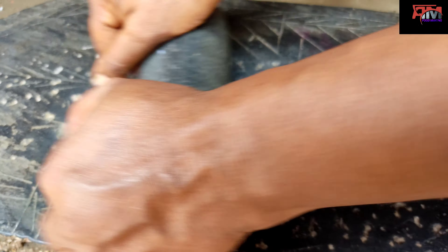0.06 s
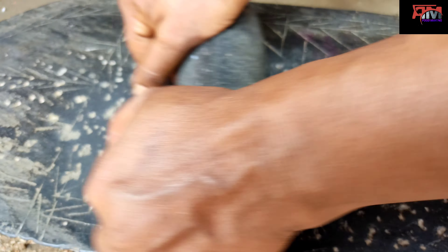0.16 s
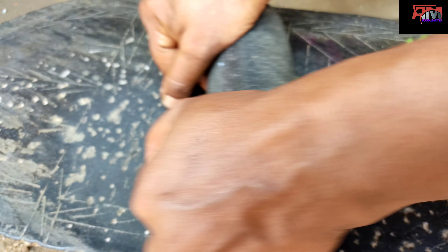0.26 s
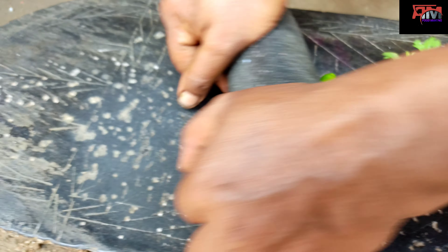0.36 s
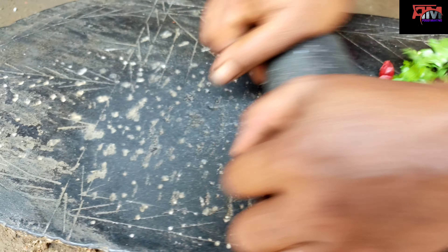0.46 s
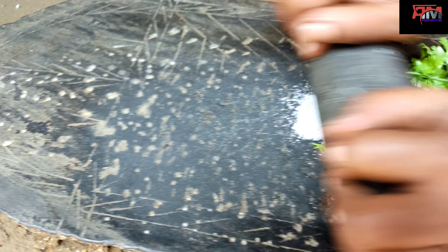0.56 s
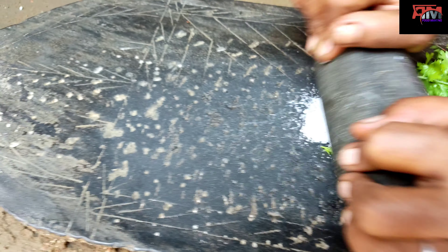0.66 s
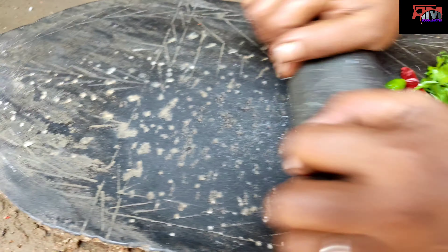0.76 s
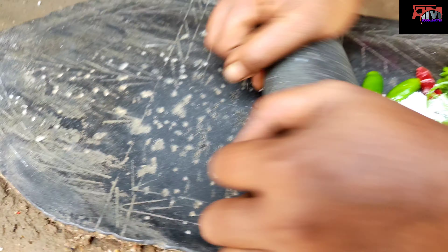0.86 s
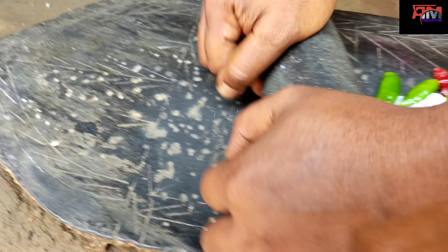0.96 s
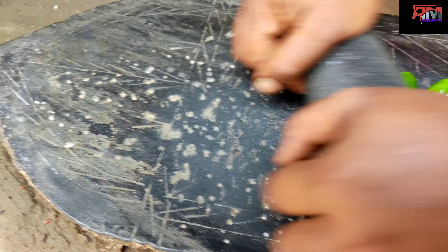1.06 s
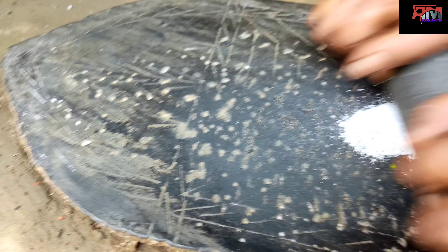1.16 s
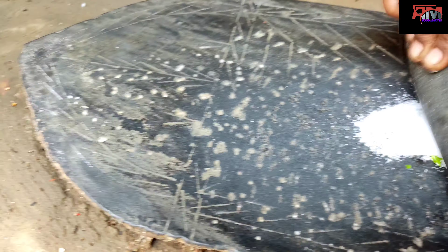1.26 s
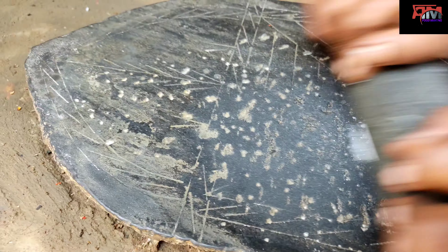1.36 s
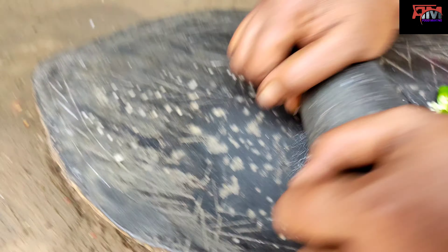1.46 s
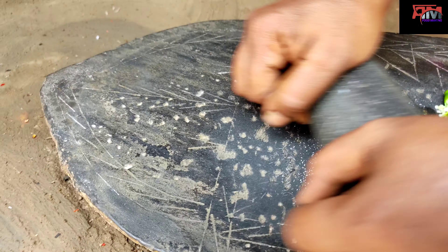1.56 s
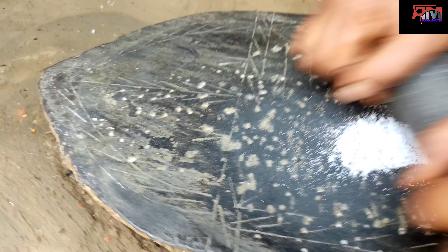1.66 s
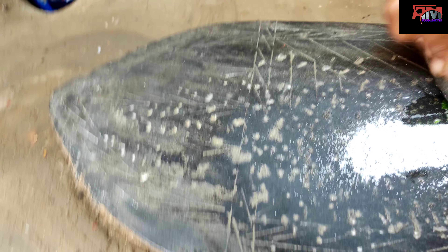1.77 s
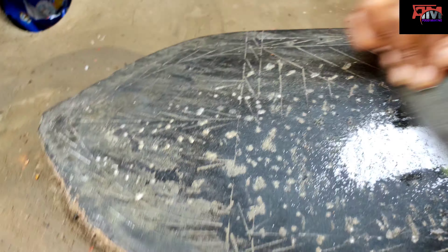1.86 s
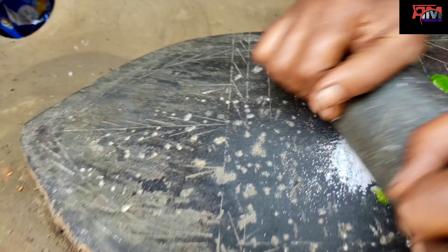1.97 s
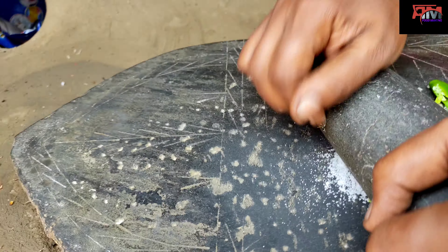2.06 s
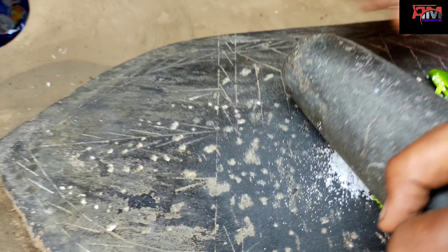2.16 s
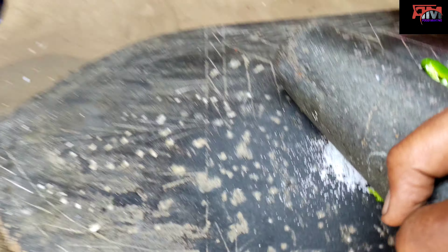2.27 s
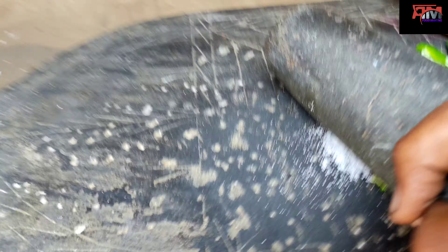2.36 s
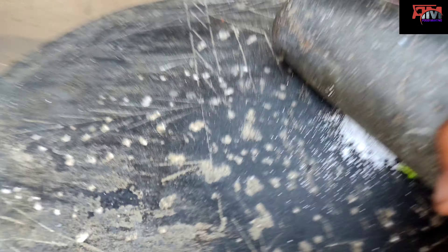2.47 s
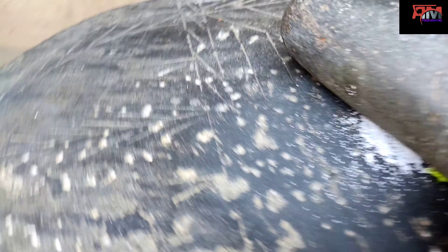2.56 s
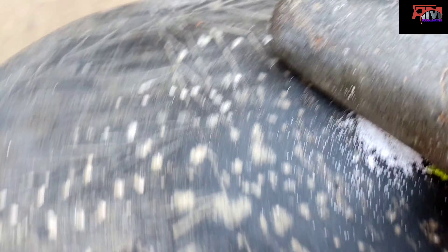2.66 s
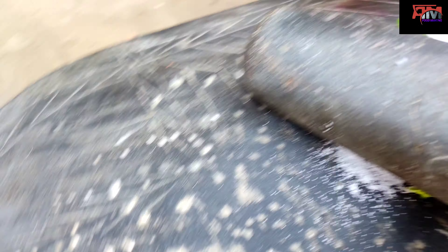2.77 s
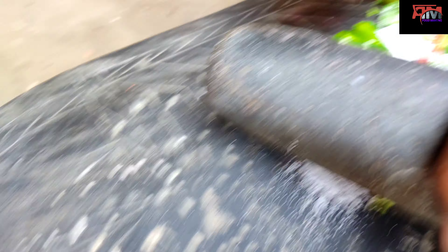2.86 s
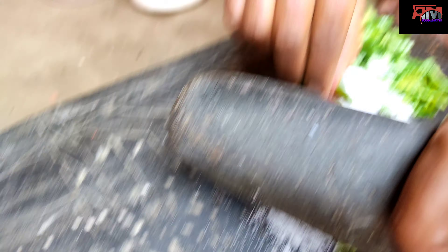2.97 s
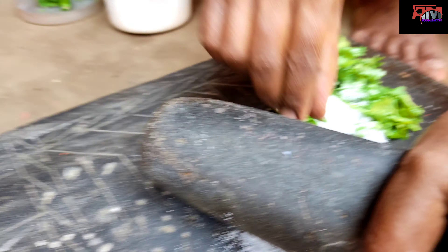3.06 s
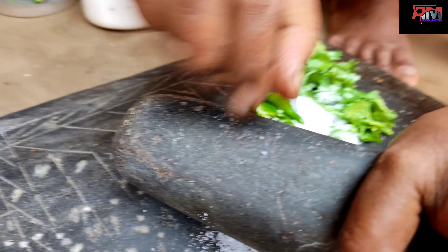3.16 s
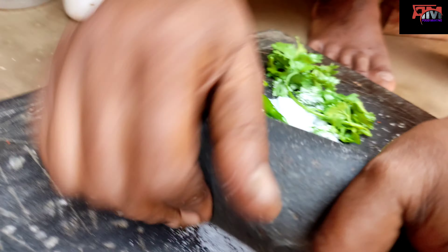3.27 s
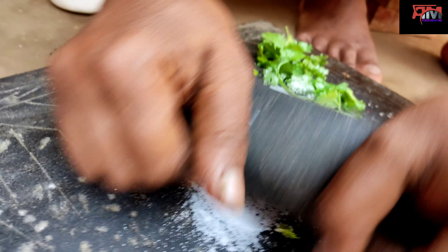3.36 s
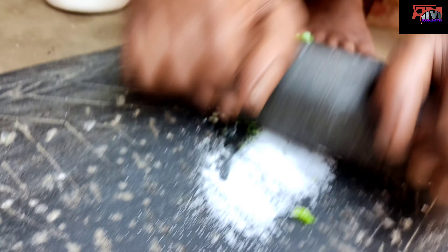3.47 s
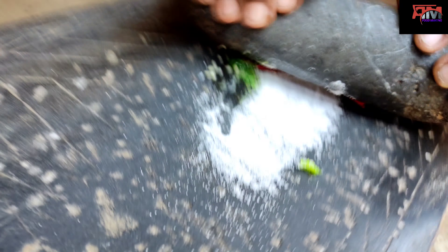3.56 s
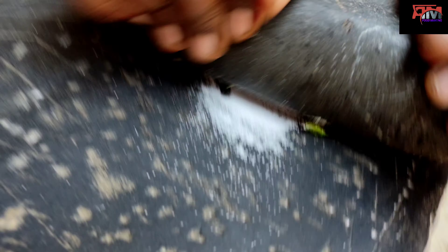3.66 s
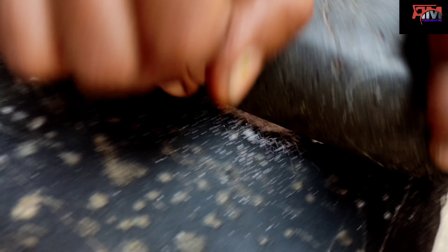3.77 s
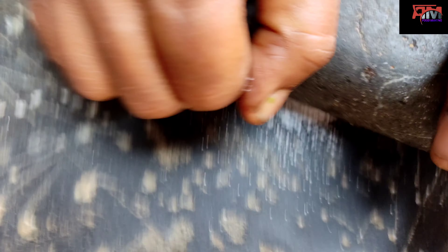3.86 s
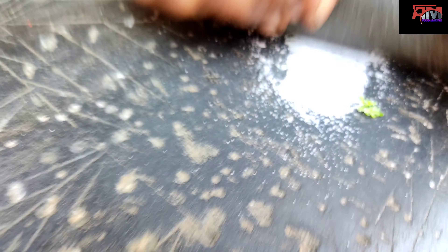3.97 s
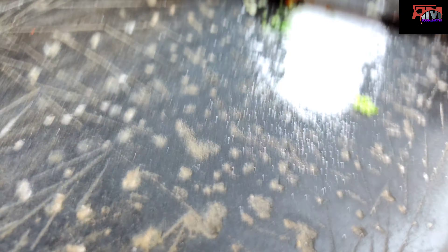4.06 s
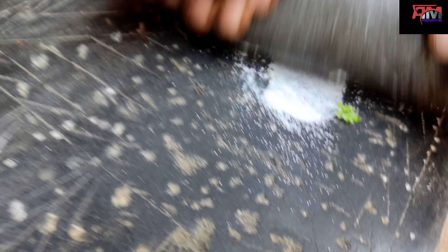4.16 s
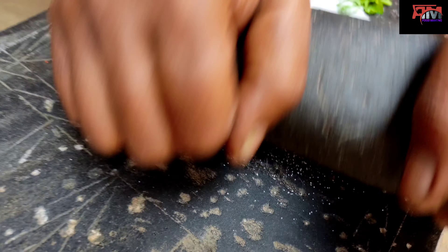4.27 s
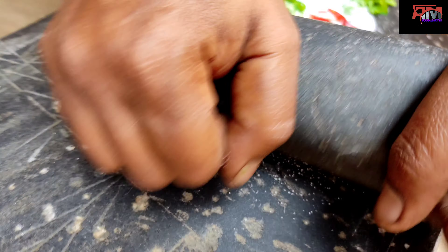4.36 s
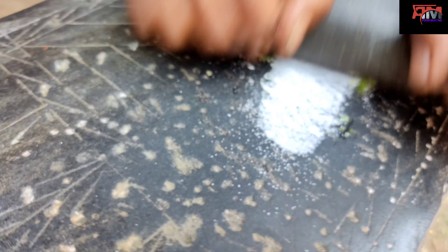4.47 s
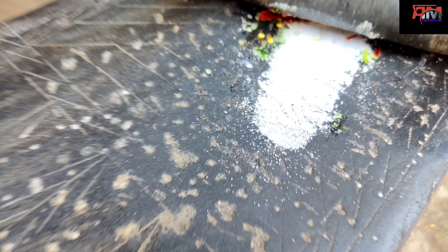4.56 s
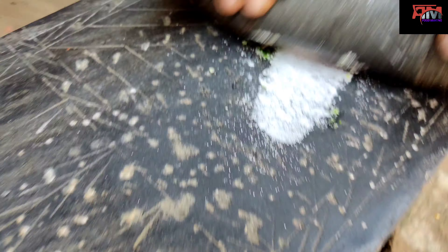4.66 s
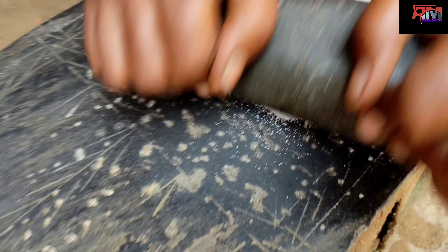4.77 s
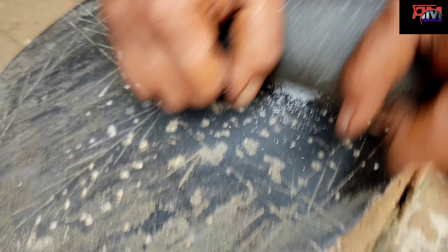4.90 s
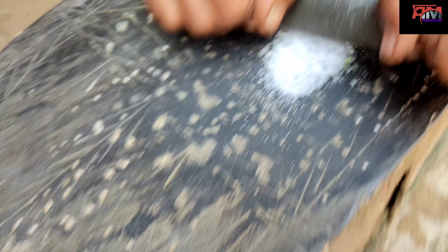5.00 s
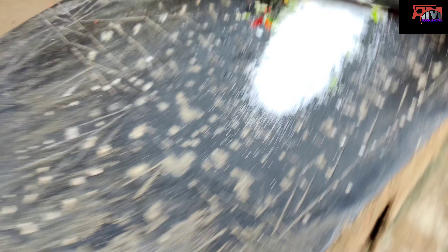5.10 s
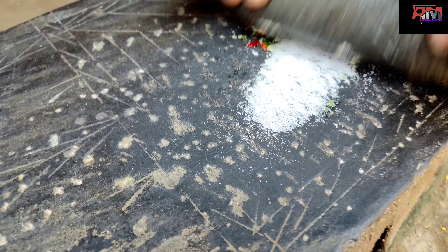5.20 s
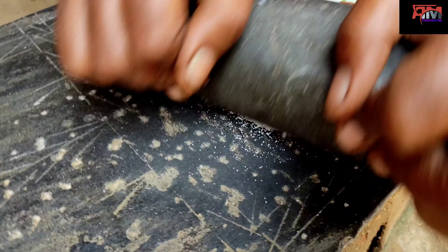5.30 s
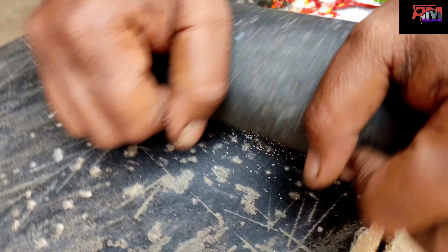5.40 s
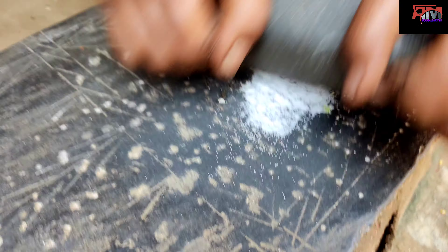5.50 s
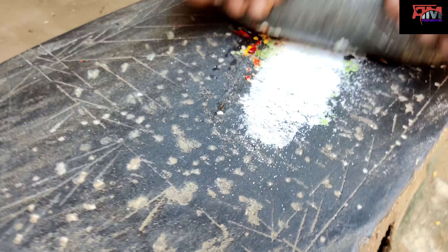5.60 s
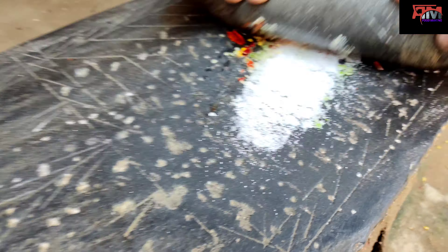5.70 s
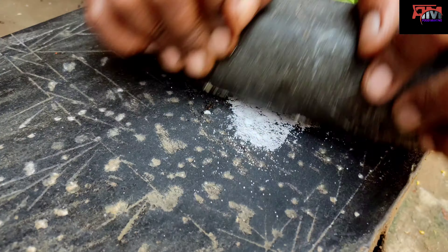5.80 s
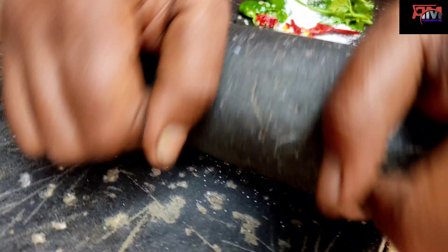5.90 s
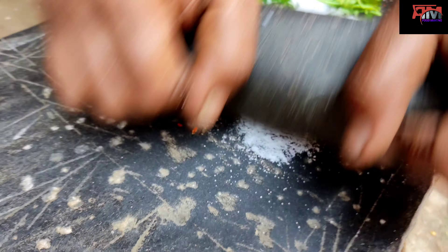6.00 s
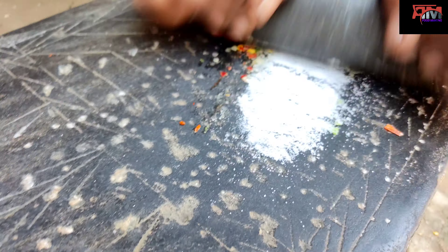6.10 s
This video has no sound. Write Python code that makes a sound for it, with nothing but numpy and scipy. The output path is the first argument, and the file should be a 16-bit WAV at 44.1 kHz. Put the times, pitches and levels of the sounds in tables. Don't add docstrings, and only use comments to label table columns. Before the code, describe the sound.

Rhythmic gritty stone-on-stone grinding, a few loud hollow knocks, a quieter pause, then faster strokes crushing salt with crisp crackling.

```python
import sys
import numpy as np
from scipy import signal
from scipy.fft import rfft, irfft, dct, next_fast_len
from scipy.io import wavfile
from scipy.ndimage import uniform_filter1d

SR = 44100
rng = np.random.default_rng(int(sys.argv[2]) if len(sys.argv) > 2 else 0)


def dump(signal):
    limited = np.clip(np.atleast_2d(signal).T, -1, 1)
    pcm = np.round(limited * 32767).astype(np.int16)
    wavfile.write(sys.argv[1], SR, pcm)


def level_to_linear(level):
    exponent = np.asarray(level, float) / 20
    return 10 ** exponent


N = 270774
SIZE = next_fast_len(N + SR)
HZ = np.maximum(np.fft.rfftfreq(SIZE, 1 / SR), 1)
LOG_HZ = np.log(HZ)
TIME_S = np.arange(N) / SR

# f/Hz, level/dB
AIR_COLOUR = [(12, -22), (20, 7.5), (74, -2), (171, 4.5), (316, -5.5), (394, 1.5), (770, -8.5), (2410, -14),
              (2850, -10.5), (5120, -21), (5720, -17.5), (8450, -12.5), (10600, -55), (12500, -56),
              (15600, -54)]
# start t/s, length t/s, level/dB
INSECT_BOUTS = [
    (0.0, 2.2, -60),
    (2.61, .1, -59),
    (2.69, .11, -53),
    (2.82, .1, -54),
    (2.95, .12, -54),
    (3.08, .12, -59),
    (3.23, .18, -59),
]
# start t/s, length t/s, f/Hz, level/dB
BIRD_COOS = [
    (2.052, 0.21, 922, -52.5),
    (2.49, 0.095, 865, -55),
]
# t/s, peak level/dB
GROUND_THUMPS = [
    (0.656, -21),
    (1.313, -15.5),
    (2.384, -22.5),
    (2.801, -30),
    (2.95, -34),
    (4.087, -24),
    (4.558, -28),
]
# f/Hz, level/dB, t60/s
GROUND_MODES = [(69, -6.5, 0.14), (117, -7.5, 0.18), (178, 9.5, 0.045), (296, 13, 0.01)]

# f/Hz, likeness 0 to 1
PORT_LIKENESS = [(40, 0.8), (150, 1), (500, 0.94), (1200, 1), (2500, 0.8), (5000, 0.7), (12000, 0.87)]
# f/Hz, left-right level/dB
PORT_BALANCE = [(60, 3.5), (130, 2.5), (290, 3), (640, 0.5), (1410, 0), (3100, -1.5), (6820, -3.5),
                (15000, 17)]
# f/Hz, left lead/rad
PORT_PHASE = [(30, -0.56), (150, -0.69), (400, -0.79), (1200, -1.695), (2200, -1.34), (4500, -1.96),
              (15000, -1.42)]
# t/s, left-right level/dB
ROLLER_PLACE = [(0.0, 0), (0.29, -3), (0.7, 4), (0.8, -0.5), (0.87, 0.5), (3.47, 3.5), (3.5, 0.5),
                (4.89, 0.5), (5.1, -1.5), (5.16, 4), (5.37, -2.5), (5.44, 0.5), (5.63, -1.5), (5.69, 5.5),
                (5.801, -2.5), (6.02, 0), (6.05, -9.5), (6.14, 0)]

# t/s, peak level/dB, left-right level/dB, tilt/(dB per octave)
FLAT_STONE = [(360, -12, 0.044), (240, -21, 0.11), (1233, 0.5, 0.03), (1386, -0.5, 0.05), (1503, -6, 0.027),
              (1730, 4, 0.013), (3440, -14.5, 0.011), (2516, -8, 0.036), (2730, -12, 0.023),
              (2040, 0.5, 0.0067)]
FLAT_LANDINGS = [
    (0.6447, 0.5, 3, 1),
    (0.732, -21.5, -1.5, 10.5),
    (0.836, -30.5, 1, -9),
    (1.081, -38, -1, 9),
    (1.11, -39.5, 8.5, 5),
    (1.172, -32, 3, -11),
]
HEAVY_STONE = [(255.3, -9, 0.11), (418, -4.5, 0.042), (836, -10, 0.051), (1294, 7, 0.026), (1480, 3, 0.03),
               (543, -10, 0.03), (1740, 1, 0.006), (2515, -4.5, 0.029), (3100, -14, 0.015),
               (2160, -6, 0.018)]
HEAVY_LANDINGS = [
    (1.3028, -1.5, 2, 1),
    (2.384, -44.5, 5, -16),
    (2.952, -47, 7.5, -11),
    (3.059, -50, 8, -8),
]
EDGE_STONE = [(363, -0.5, 0.035), (546, -16.5, 0.035), (1087, 6.5, 0.045), (1413, -2, 0.026),
              (1116, -6, 0.026), (2580, -2, 0.04), (2845, -2, 0.035), (3130, -12, 0.011)]
EDGE_LANDINGS = [
    (3.723, -9, -1, 0),
    (3.947, -37.5, 5, -2.5),
    (4.215, -1.5, -1, 0),
    (4.45, -42, 7.5, -18),
    (5.048, -34.5, 7.5, -1),
    (5.253, -39, 2, -3),
    (5.746, -27.5, -15, -3.5),
]
TIP_STONE = [(462, 0.5, 0.029), (590, -14, 0.079), (1310, 2.5, 0.043), (1380, -13.5, .05), (1800, -15, .05),
             (2540, -10, 0.027)]
TIP_LANDINGS = [
    (1.876, -18.5, 0, 0.5),
    (1.939, -26.5, 2, 0.5),
]
HEEL_STONE = [(234, -10, 0.074), (451, -1, 0.036), (1040, -2, 0.056), (1384, -0.5, .06), (1930, -18, 0.034),
              (2560, -3.5, .04), (2870, -12.5, .035)]
HEEL_LANDINGS = [
    (4.071, -17, -0.5, -1),
    (4.5, -39, 4, -3),
    (2.2, -45, 0, -3),
]
REST_STONE = [(386, -3, 0.036), (584, -4, 0.051), (1107, 6, .08), (1370, -9, 0.05), (1730, -19, .03)]
REST_LANDINGS = [
    (2.134, -23.5, 2, -5),
    (2.176, -40, 1, -6),
]
# delay t/s, level/dB
ROCKING = [
    (.0093, -16),
    (.037, -21),
]

# f/Hz, density level/dB
SALT_COLOUR = [(1470, -79), (2500, -14.5), (3030, -19.5), (4180, -8.5), (4790, -10.5), (5670, -4),
               (6820, -1), (7250, 2.5), (7650, 3), (8920, 0), (10600, -17.5), (14100, -20), (15600, -32.5)]
# f/Hz, width f/Hz, level/dB
SLAB_RINGS = [(4560, 82, -6), (5805, 52, 5.5)]
# f/Hz, width f/Hz, level/dB
SLAB_HOLLOWS = [(3910, 330, -6), (5050, 200, -6)]
# t/s, peak level/dB, left-right level/dB, dullness -1 to 1, t60/s
SINGLE_CRYSTALS = [(0.31, -21.5, 1, 0.3, 0.017), (0.3454, -36, 4, 0.3, 0.02),
                   (0.3541, -32.5, 1.5, 0.3, 0.02), (0.3604, -36, -2, 0.3, 0.02),
                   (0.378, -33, 3, 0.3, 0.028), (0.4868, -29, 5, 0.26, 0.029), (0.544, -27, -5, 0.3, 0.017),
                   (0.548, -22.5, -1, 0.36, 0.018), (0.63, -27, 5, 0.32, 0.02),
                   (0.6359, -21, 7, 0.37, 0.017), (0.642, -20, 2, 0.36, 0.027),
                   (0.652, -20.5, 6, 0.34, 0.018), (0.734, -28, 1, 0.3, 0.02), (0.7447, -24, 0, 0.34, 0.046),
                   (0.7696, -17.5, -5, 0.3, 0.02), (0.8093, -14.5, 1, 0.59, 0.032),
                   (0.818, -18.5, -6, 0.92, 0.026), (0.965, -35, 9, 0.4, 0.023),
                   (1.0829, -40, -3, 0.3, 0.012), (1.1119, -34, 3, 0.3, 0.017), (1.172, -36, -1, 0.3, 0.03),
                   (1.252, -35.5, 23, 0.53, 0.025), (1.251, -20.5, -4, 0.96, 0.03),
                   (1.287, -22, 1.0, 0.3, 0.023), (1.3054, -26.5, 2.5, 0.34, 0.03),
                   (1.356, -36, -2.5, 0.27, 0.02), (1.3725, -16, -11, 0.54, 0.02),
                   (1.4, -20, -2, 0.39, 0.028), (1.7769, -36, 1.5, 0.26, 0.018),
                   (1.826, -19.5, -4, 0.41, 0.02), (2.0986, -41, 3.0, 0.3, 0.02),
                   (2.646, -31, 8, 0.24, 0.016), (2.962, -38, 4, 0.26, 0.023),
                   (3.0594, -31.5, 2, 0.24, 0.021), (3.1038, -40, 3, 0.33, 0.024),
                   (3.1158, -34, 0, 0.24, 0.025), (3.24, -41, 1, 0.3, 0.022),
                   (3.517, -20, 2, 0.11, 0.021), (3.5376, -11.5, -6, 0.11, 0.029),
                 (3.557, -13, 2, 0.1, 0.024), (3.5622, -16.5, 1, 0.11, 0.027),
                 (3.5717, -19, -2, 0.1, 0.033), (3.5818, -9.5, 0, 0.34, 0.024),
                 (3.6312, -15, 4, 0.1, 0.032), (3.6364, -9.5, 2, 0.1, 0.017),
                 (3.6494, -8, -3, 0.091, 0.017), (3.6598, -12, 6, 0.11, 0.025),
                 (3.6844, -10.5, 4, 0.11, 0.027), (4.0218, -20, 4, 0.1, 0.031),
                 (4.0542, -11, -4.5, 0.083, 0.03), (4.0837, -16, 7, 0.1, 0.031),
                 (4.127, -10.5, -2, 0.1, 0.025), (4.136, -15, 0, 0.081, 0.031),
                 (4.148, -14.5, 4, 0.1, 0.028), (4.16, -21, 3, 0.1, 0.022), (4.1904, -19, 3, 0.089, 0.019),
                 (4.2462, -21, 3, 0.1, 0.023), (4.655, -23, 4, 0.1, 0.018), (4.678, -17.5, -5, 0.1, 0.041),
                 (4.6968, -18, -3, 0.091, 0.033), (4.7267, -15, -1, 0.11, 0.028),
                 (5.0552, -32, 1, 0.13, 0.032), (5.0766, -21.5, -6, 0.087, 0.025),
                 (5.1934, -21.5, 8, 0.1, 0.03), (5.217, -2.5, 0, 0.081, 0.0083),
                 (5.5152, -33.5, 1, 0.087, 0.025), (5.734, -25, 3, 0.11, 0.025),
                 (6.07, -34, -5, 0.1, 0.025), (5.2252, -8, 7, 0.1, 0.011), (5.207, -21, 5, 0.1, 0.03),
                 (3.6663, -7, 8, 0.1, 0.015), (3.672, -11, 1, 0.1, 0.012), (3.678, -3, 2, 0.1, 0.013),
                 (3.695, -11, 5, 0.1, 0.017)]
# t/s, level/dB, rise t/s, fall t/s (each for 25 dB), coarseness level/dB
CRYSTAL_HEAPS = [(.31, -43, 0.018, 0.14, 7), (.55, -36.5, 0.012, 0.19, 11.5), (.64, -40.5, .02, 0.03, 23),
                 (.82, -31.5, 0.033, 0.079, 8), (1.403, -36, 0.23, 0.13, 12),
                 (2.578, -45, 0.15, 0.023, 11.5), (2.65, -43.5, 0.13, 0.12, 9.5),
                 (3.109, -45, 0.025, 0.074, 14.5), (3.262, -48.5, 0.13, 0.3, 12),
                 (3.535, -29, 0.045, 0.11, 9.5), (3.571, -23.5, 0.057, 0.016, -14),
                 (3.651, -21, .015, 0.055, -13), (3.68, -15.5, 0.079, 0.089, -11),
                 (4.052, -23, 0.054, 0.086, -4.5), (4.08, -33, 0.052, 0.012, -17),
                 (4.15, -25.5, 0.019, 0.094, -13), (4.194, -20, 0.039, 0.1, -7),
                 (4.579, -34.5, 0.059, 0.14, 5.5), (4.7, -28.5, 0.055, 0.14, -0.5),
                 (5.085, -34, 0.082, 0.18, 8.5), (5.45, -42, 0.097, 0.066, 8.5),
                 (5.628, -35.5, 0.04, 0.082, 3), (5.863, -30.5, 0.27, 0.065, -3)]

# start t/s, length t/s, rumble level/dB, ring level/dB, salt level/dB
PULL_STROKES = [(-.01, 0.055, -64, -48.5, -75), (.44, 0.13, -46.5, -47.5, -44.5),
                (1.05, 0.23, -45, -42, -48), (1.6, 0.26, -43.5, -43, -43), (2.42, 0.34, -69, -64, -50.5),
                (3.2, 0.3, -60, -72, -45.5), (3.33, 0.21, -44.5, -47, -40.5), (3.89, 0.2, -42, -45.5, -39),
                (4.4, 0.21, -44.5, -39.5, -41), (4.94, 0.22, -46.5, -42, -41.5),
                (5.47, 0.21, -47.5, -45, -42), (5.99, 0.49, -44.5, -42, -29.5)]
PUSH_STROKES = [(0.0, 0.45, -52, -35, -55.5), (.62, 0.13, -39.5, -56, -41), (.725, 0.14, -43.5, -41.5, -37),
                (.8, .17, -39.5, -37.5, -45), (1.3, 0.29, -37.5, -39.5, -41), (1.85, 0.25, -37, -44, -37),
                (2.11, 0.12, -53.5, -51, -51.5), (2.68, 0.28, -58.5, -67, -51),
                (3.61, 0.21, -40, -52.5, -34), (3.7, 0.13, -34.5, -48, -38.5),
                (4.11, 0.28, -37.5, -42, -49), (4.65, 0.25, -36, -42.5, -34.5),
                (5.18, 0.26, -37.5, -41.5, -33.5), (5.71, .28, -40, -45.5, -36.5),
                (6.08, 0.17, -51, -44, -50)]
PULL_COURSE = [(0.599, 0.78), (0.601, 1), (0.749, 0.76)]
PUSH_COURSE = [(0.41, 0.94), (0.48, 1.86), (0.36, 2.16)]
# rumble, ring, salt level/dB
RESTING_LEVELS = [-66.5, -76.5, -60]
GRIT_LEVELS = [-8, -10.5, -16]
# [f/Hz, width f/Hz, level/dB]
STONE_GRIPS = [
    (0, 0.11, [(796, 120, 5), (1200, 80, 23.5), (1910, 79, 5), (2730, 43, 2)]),
    (0.117, .27, [(335, 55, 9), (738, 65, 18), (1187, 79, 12), (1900, 150, 2.5), (2900, 97, 1)]),
    (0.27, 0.41, [(403, 82, 5), (722, 72, 16), (1220, 86, 7), (1850, 190, 1.5), (2840, 57, 3.5), (3530, 57, -11)]),
    (0.428, 2.9, [(358, 62, -7), (641, 145, 0), (1104, 920, -16), (2125, 14, -2), (2414, 65, -9.5), (2762, 23, 6.5), (3230, 150, -9.5), (4160, 30, 0.5)]),
    (2.9, 6.8, [(363, 120, -5), (1076, 35, 12.5), (2500, 290, -21), (4200, 57, -21)]),
]
# f/Hz, density level/dB
DRAG_COLOUR = [(35, -41), (60, 12), (375, 5.5), (533, 3.5), (771, 5), (963, 2), (1100, 12), (1770, 0.5),
               (5000, 4.5), (6500, -32), (11000, -120)]
# f/Hz, depth level/dB
RAGGED_DEPTH = [(300, -1), (1500, 3), (3500, 6.5), (6000, 6), (10000, 5), (15000, -0.5)]

# f/Hz, local level over step level/dB
RESOLUTION = [(200, 22), (800, 16), (1300, 8), (2000, 3), (3000, 1), (3900, -3), (4500, -1), (5150, -5),
              (6000, 1),
              (8000, 4), (9200, 3), (9800, -5), (12000, -6), (14500, -8), (15650, -11), (15850, -60)]


def table_at(points, log_hz):
    hz, values = np.array(points)[:, 0], np.array(points)[:, 1]
    return np.interp(log_hz, np.log(hz), values)


def at_hz(points):
    return table_at(points, LOG_HZ)


def resonances(peaks):
    total = 0
    for k, (hz, width, db) in enumerate(peaks):
        response = 1j * HZ * width / (hz ** 2 - HZ ** 2 + 1j * HZ * width)
        total = total + (-1) ** k * level_to_linear(db) * response
    return total


def band(low_hz, high_hz):
    return 1 / np.sqrt((1 + (low_hz / HZ) ** 8) * (1 + (HZ / high_hz) ** 8))


def through(pair, response):
    return rfft(pair, SIZE) * response / np.sqrt(np.mean(np.abs(response) ** 2))


def drift(rate_hz):
    knots = rng.standard_normal(4000)
    return np.interp(TIME_S * rate_hz, np.arange(4000), knots)


def ports(spectra):
    alike = np.clip(at_hz(PORT_LIKENESS), 0, 1)
    shared, own = spectra * np.sqrt([(1 + alike) / 2, (1 - alike) / 2])
    side = level_to_linear(at_hz(PORT_BALANCE) / 2)
    left = (shared + own) * side * np.exp(1j * at_hz(PORT_PHASE))
    right = (shared - own) / side
    return irfft(np.array([left, right]), SIZE)[:, :N]


def yard():
    air = through(rng.standard_normal((2, N)) * level_to_linear(-50), level_to_linear(at_hz(AIR_COLOUR)))
    insect_hz = 2795 + 5 * drift(25.0)
    tone = np.sin(2 * np.pi * np.cumsum(insect_hz) / SR)
    bouts, fade_s = 0, 0.02
    for s, length, db in INSECT_BOUTS:
        inside_s = np.minimum(TIME_S - s, s + length - TIME_S)
        bouts = bouts + level_to_linear(db) * np.clip(inside_s / fade_s, 0, 1)
    song = bouts * level_to_linear(2.0 * drift(10.0))
    return air + rfft(song * tone * [[1], [0]], SIZE)


def far_bird():
    out = np.zeros((2, N))
    for s, length, hz, db in BIRD_COOS:
        t = np.arange(round(length * SR)) / SR
        swell = np.sin(np.pi * t / length) ** 0.38
        coo = np.sin(2 * np.pi * hz * (t - 0.04 * t ** 2))
        out[0, round(s * SR):][:len(t)] = level_to_linear(db) * swell * coo
    return rfft(out, SIZE)


def thumps():
    push = np.zeros((2, N))
    for s, db in GROUND_THUMPS:
        push[0, round(s * SR):][:150] = level_to_linear(db - 21.5) * np.hanning(150)
    peaks = []
    for hz, db, t60 in GROUND_MODES:
        width_hz = np.log(1000) / np.pi / t60
        peaks.append((hz, width_hz, db - 20 * np.log10(.01 / t60)))
    return rfft(push, SIZE) * resonances(peaks)


def echoes(x):
    t60_s, level_db, dull_hz = 0.2, -12, 2200.0
    t = np.arange(SR // 2) / SR
    tail = rng.standard_normal((2, len(t))) * level_to_linear(-60 * t / t60_s) * (t > .004)
    tail = tail / np.sqrt(np.sum(tail ** 2, axis=1, keepdims=True))
    reflected = rfft(x, SIZE) * rfft(tail, SIZE) / (1 + 1j * HZ / dull_hz)
    return level_to_linear(level_db) * irfft(reflected, SIZE)[:, :N]


def knocks():
    contact_s, rise_s, rattle_t60_s = .0016, 0.00096, 0.061
    low_rise_cycles = 0.8
    out, t = np.zeros((2, N + 9000)), np.arange(9000) / SR
    rattle_filter = signal.butter(4, [220., 1700.], "band", fs=SR, output="sos")
    rise = np.sin(np.pi / 2 * np.minimum(t / rise_s, 1)) ** 2
    landings = [(FLAT_STONE, FLAT_LANDINGS), (HEAVY_STONE, HEAVY_LANDINGS), (EDGE_STONE, EDGE_LANDINGS),
                (TIP_STONE, TIP_LANDINGS), (HEEL_STONE, HEEL_LANDINGS), (REST_STONE, REST_LANDINGS)]
    for modes, hits in landings:
        hz, mode_db, t60 = np.transpose(modes)[:, :, None]
        lead = table_at(PORT_PHASE, np.log(hz))
        ring_s = np.clip(t60, .006, .025 + 30 / hz)
        envelope = level_to_linear(-60 * t / ring_s) * np.minimum(t * hz / low_rise_cycles, 1)
        chance = rng.standard_normal((len(hits), 3, len(modes), 1))
        rattles = signal.sosfilt(rattle_filter, rng.standard_normal((len(hits), 3, len(t))))
        for (s, db, pan_db, tilt_db), (strength, turn, skew), rattle in zip(hits, chance, rattles):
            gains = level_to_linear(mode_db + tilt_db * np.log2(hz / 1000) + 1.5 * strength)
            rattle_gain = level_to_linear(-16.0 + tilt_db - 60 * t / rattle_t60_s)
            start = round((s + contact_s) * SR)
            for side, shift in enumerate([lead + 0.17 * skew, 0]):
                phase = 2 * np.pi * hz * t + turn * hz / 2200.0 + shift
                wave = np.sum(gains * envelope * np.sin(phase), axis=0) / gains.sum()
                wave = wave + (rattle[side] + rattle[2]) * rattle_gain
                out[side, start:][:9000] += wave * rise * level_to_linear(db + 8.0 + pan_db * (1 - side))
    out = out + sum(level_to_linear(db) * np.roll(out, round(delay * SR), axis=1) for delay, db in ROCKING)
    return signal.sosfilt(signal.butter(4, [130, 3800], "band", fs=SR, output="sos"), out[:, :N])


def bursts():
    crystals = SINGLE_CRYSTALS
    out, t = np.zeros((2, N + 2000)), np.arange(2000) / SR
    noise = rng.standard_normal((len(crystals), 2, 2000))
    for (s, db, pan_db, dull, t60), puff in zip(crystals, noise):
        decay = level_to_linear(db - 4.5 - 60 * t / max(.8 * t60, .005))
        shape = decay * np.minimum(t / 0.00043, 1)
        puff = signal.lfilter([1], [1, -np.clip(dull, -.8, .8)], puff)
        out[:, round(s * SR):][:, :2000] += shape * puff * level_to_linear([[pan_db / 2], [-pan_db / 2]])
    slab_delay_s, slab_db = .0016, -6
    reflection = 1 + level_to_linear(slab_db) * np.exp(-2j * np.pi * HZ * slab_delay_s)
    return irfft(through(out, level_to_linear(at_hz(SALT_COLOUR)) ** 1.14 * reflection), SIZE)[:, :N]


def strokes():
    power = level_to_linear(2 * np.array(RESTING_LEVELS))[:, None] * np.ones(N)
    for rows, course in [(PULL_STROKES, PULL_COURSE), (PUSH_STROKES, PUSH_COURSE)]:
        peak, follows = np.transpose(course)[:, :, None]
        warp = np.log(.5) / np.log(np.clip(peak, .1, .9))
        for s, length, *db in rows:
            now = slice(max(round(s * SR), 0), min(round((s + length) * SR), N))
            done = np.clip((TIME_S[now] - s) / length, 0, 1) ** warp
            speed = np.abs(np.sin(np.pi * done))
            power[:, now] += (level_to_linear(np.array(db))[:, None] * speed ** follows) ** 2
    return power


def heaps():
    total, roundness = 0, 1.19
    for s, db, rise, fall, coarse_db in CRYSTAL_HEAPS:
        distance = np.abs(TIME_S - s) / np.where(TIME_S < s, rise, fall)
        crunch = level_to_linear(2 * db - 49.8 * distance ** roundness)
        total = total + crunch * level_to_linear([[0], [2 * coarse_db]])
    return total


def singing(level_db):
    rub = rng.standard_normal((2, N)) * level_to_linear(level_db - 2) * (TIME_S > 4.1)
    return ports(through(rub, resonances(SLAB_RINGS) * band(4000, 6500)))


def grains(per_s, spread_db, clump_db, clump_hz):
    sizes = level_to_linear(spread_db * np.minimum(rng.exponential(1, N), 3.0) + clump_db * drift(clump_hz))
    sizes = sizes * (rng.random(N) < per_s / SR)
    return sizes * rng.standard_normal((2, N)) / np.sqrt(np.mean(sizes ** 2))


def salt(level_db):
    gain = level_to_linear(level_db + 3.0)
    crackle = grains(per_s=9000., spread_db=0.5, clump_db=1.0, clump_hz=306.5) * gain
    snaps = grains(per_s=3000., spread_db=2.0, clump_db=1.5, clump_hz=150.7) * gain
    hollows_db = sum(db * np.exp(-((HZ - hz) / width) ** 2) for hz, width, db in SLAB_HOLLOWS)
    colour = level_to_linear(hollows_db) * level_to_linear(at_hz(SALT_COLOUR))
    fine = TIME_S > 3.2
    dull_top = level_to_linear(at_hz([(9000, 0.014), (10500, -6)]))
    coarse = through(snaps * ~fine, colour * dull_top)
    powder = through(crackle * fine, colour)
    return ports(coarse + powder)


def grinding(levels_db):
    out = 0
    catches = grains(per_s=3900.0, spread_db=1.0, clump_db=2.5, clump_hz=59.88)
    bands_hz = [(135, 600), (600, 1600), (1600, 4500)]
    for start, end, peaks in STONE_GRIPS:
        body = resonances(peaks) + level_to_linear(at_hz(DRAG_COLOUR) - 12.5)
        held = catches * (TIME_S >= start) * (TIME_S < end)
        for level_db, edges in zip(levels_db, bands_hz):
            out = out + through(held * level_to_linear(level_db), body * band(*edges))
    return out


def shifting(x):
    hz, when, cells = signal.stft(x, SR, nperseg=1024)
    chance = uniform_filter1d(rng.standard_normal(cells.shape[1:]), size=3, axis=0)
    chance = uniform_filter1d(uniform_filter1d(chance, size=8, axis=1), size=5, axis=1)
    depth_db = table_at(RAGGED_DEPTH, np.log(hz + 1))[:, None]
    calm = np.where(when < 0.64, 0.39, 1)
    gain = level_to_linear(depth_db * calm * chance / chance.std())
    local_rms = np.sqrt(uniform_filter1d(gain ** 2, size=31, axis=0))
    return signal.istft(cells * gain / local_rms, SR)[1][:, :N]


def scene():
    power, (crunch, coarse) = strokes(), heaps()
    grit = level_to_linear(2 * np.array(GRIT_LEVELS)) @ (power + [[0], [0], [1]] * coarse)
    levels = 10 * np.log10([power[0], power[1], power[2] + crunch, grit])
    rumble_db, ring_db, salt_db, grit_db = levels
    rubbing = shifting(ports(grinding([rumble_db, ring_db, grit_db])) + salt(salt_db))
    rubbing = rubbing + singing(10 * np.log10(power[2] + 0.041 * crunch))
    s, pan_db = np.transpose(ROLLER_PLACE)
    place = level_to_linear(np.interp(TIME_S, s, pan_db - 1.5) * [[.5], [-.5]])
    background = ports(yard() + thumps() + far_bird())
    hits = knocks()
    return background + hits + echoes(hits) + bursts() + place * rubbing


def coarse_resolution(x, patchy_db, attack_db):
    hop, grid, bins = 1024, 307, 16
    window = signal.windows.kaiser_bessel_derived(2 * hop, 4 * np.pi)
    padded = np.pad(x, ((0, 0), (2 * hop - grid, 3 * hop)))
    starts = np.arange(0, padded.shape[1] - 2 * hop, hop)
    raw = padded[:, starts[:, None] + np.arange(2 * hop)]
    a, b, c, d = np.split(raw * window, 4, axis=-1)
    folded = np.concatenate([-c[..., ::-1] - d, a - b[..., ::-1]], axis=-1)
    lines = dct(folded, type=4, norm="ortho")
    own = uniform_filter1d(lines ** 2, size=48, axis=2)
    around = np.minimum(uniform_filter1d(own, size=3, axis=1), 4 * own)
    patches = rng.standard_normal(lines[..., ::bins].shape)
    patches = uniform_filter1d(patches, size=5, axis=1) * np.sqrt(5)
    middles = slice(bins // 2, None, bins)
    places = np.arange(hop)[middles] * SIZE // (2 * hop)
    fine_db = at_hz(RESOLUTION)[places]
    step = np.sqrt(around[..., middles] + 1e-16) * level_to_linear(patchy_db * patches - fine_db)
    step = np.repeat(step, bins, axis=2)
    rounded = np.sign(lines) * np.floor(np.abs(lines) / step + .4054) * step
    slope = np.gradient(raw, axis=2).reshape(2, len(starts), 16, -1)
    blocks = np.mean(slope ** 2, axis=(0, 3)) + 1e-16
    sudden = blocks.max(axis=1) > level_to_linear(2 * attack_db) * np.median(blocks, axis=1)
    kept = np.where(sudden[:, None], lines, rounded)
    first, second = np.split(dct(kept, type=4, norm="ortho"), 2, axis=-1)
    frames = np.concatenate([second, -second[..., ::-1], -first[..., ::-1], -first], axis=-1) * window
    joined = frames[:, 1:, :hop] + frames[:, :-1, hop:]
    return joined.reshape(2, -1)[:, hop - grid:][:, :N]


def roll_off(x):
    return signal.sosfilt(signal.butter(12, 15800, fs=SR, output="sos"), x)


def record(dry):
    turn = np.array([[1, 0.76], [1, -0.88]]) / np.sqrt(2)
    rounded = 2.5 * np.tanh(dry / 2.5)
    mix = turn @ coarse_resolution(turn @ rounded, patchy_db=4.0, attack_db=11.5)
    return roll_off(mix)


dry = scene()
out = record(dry)
dump(out)
```